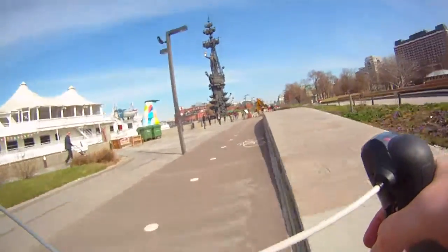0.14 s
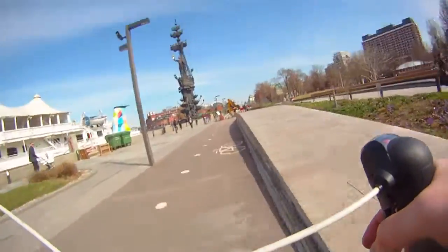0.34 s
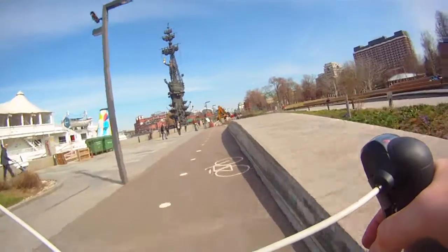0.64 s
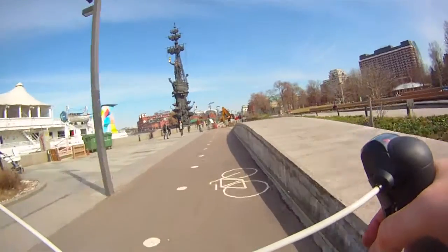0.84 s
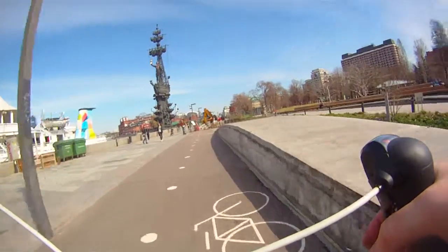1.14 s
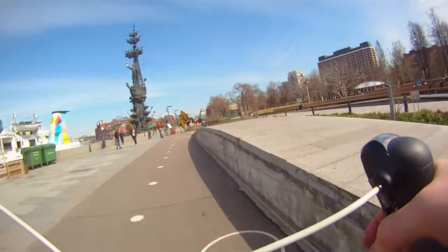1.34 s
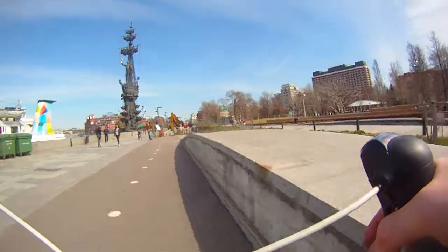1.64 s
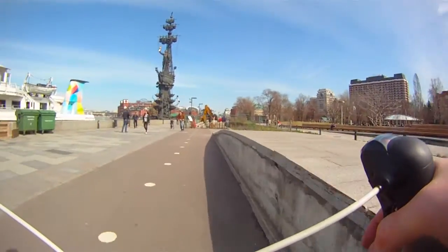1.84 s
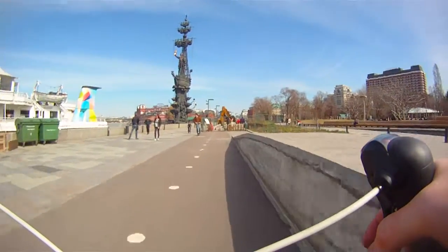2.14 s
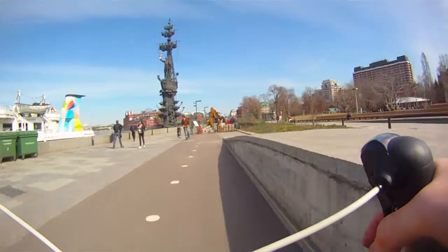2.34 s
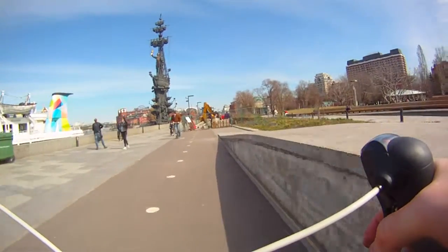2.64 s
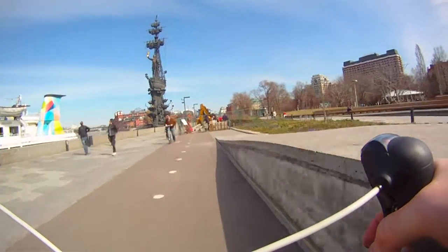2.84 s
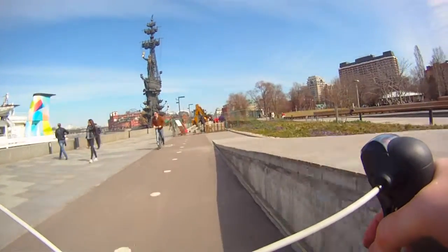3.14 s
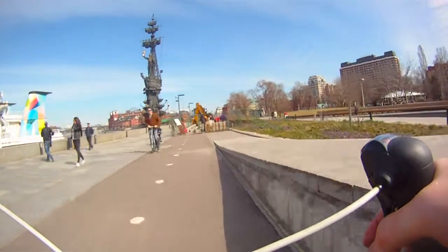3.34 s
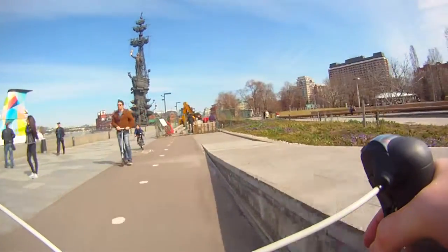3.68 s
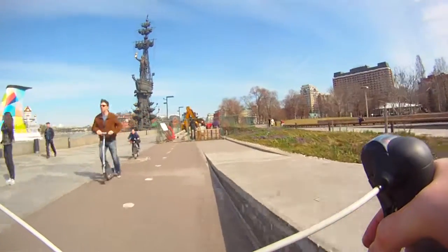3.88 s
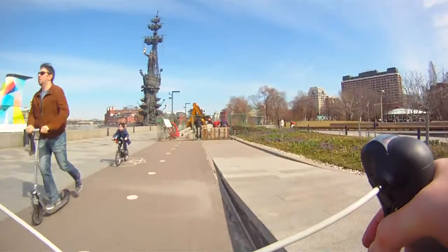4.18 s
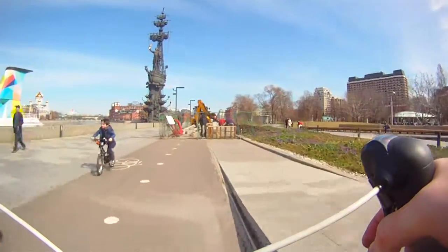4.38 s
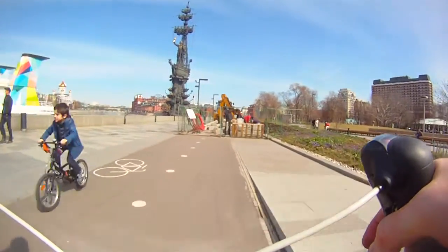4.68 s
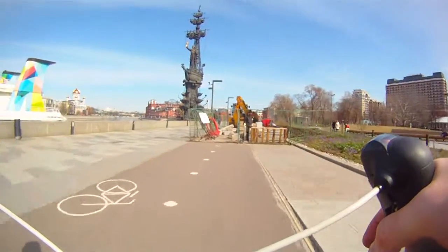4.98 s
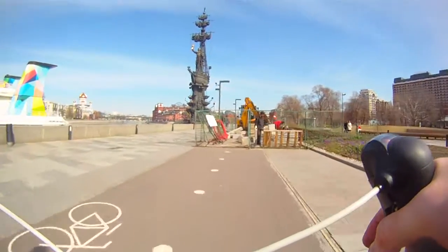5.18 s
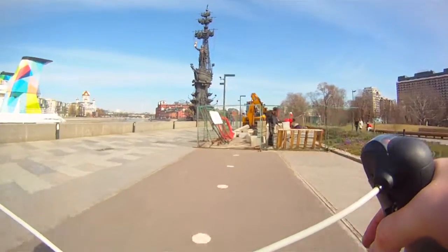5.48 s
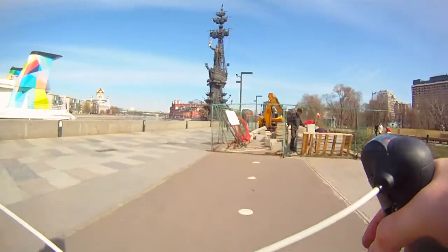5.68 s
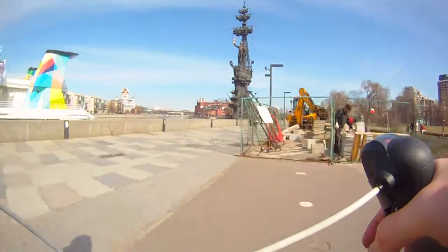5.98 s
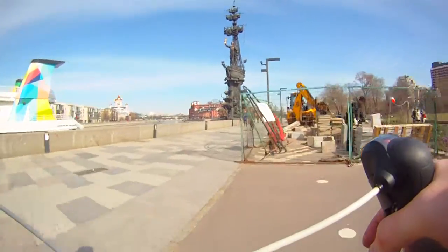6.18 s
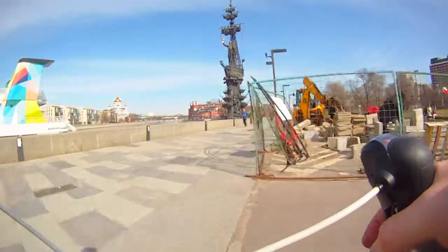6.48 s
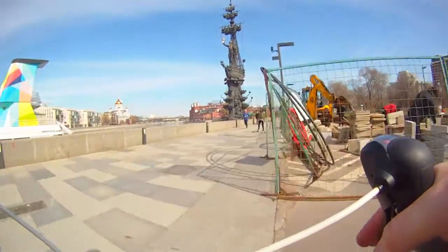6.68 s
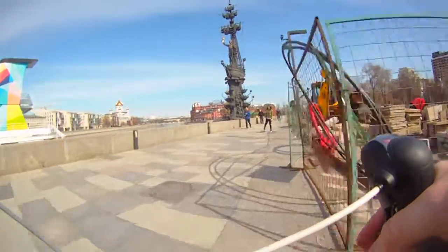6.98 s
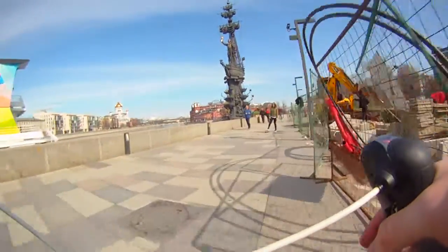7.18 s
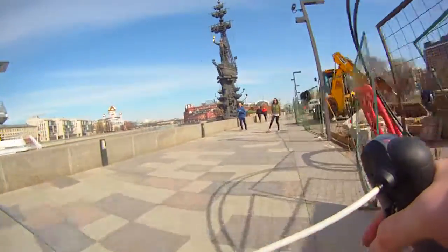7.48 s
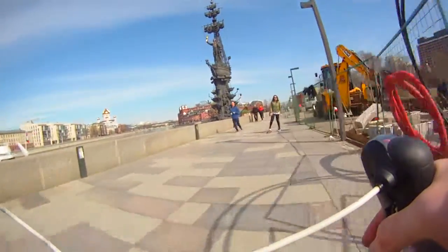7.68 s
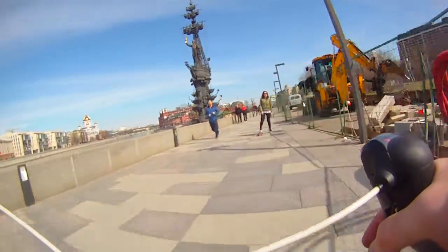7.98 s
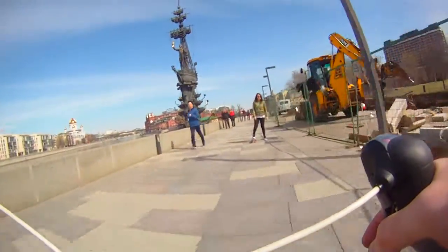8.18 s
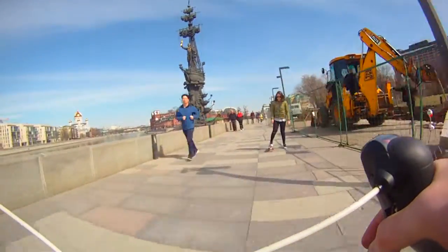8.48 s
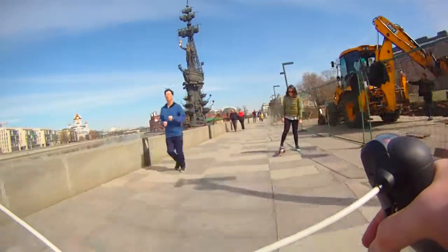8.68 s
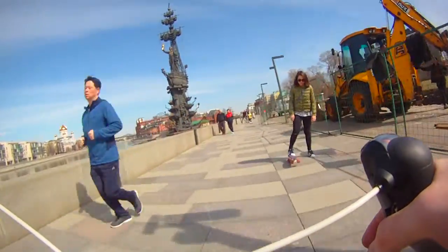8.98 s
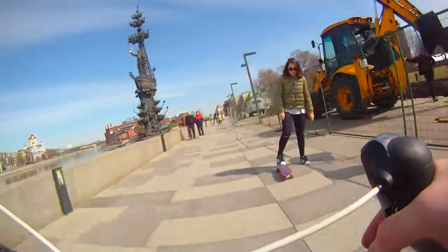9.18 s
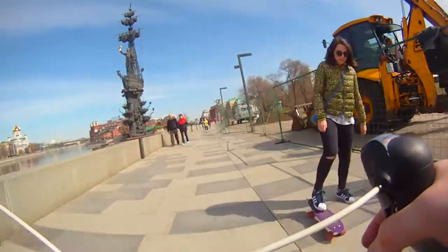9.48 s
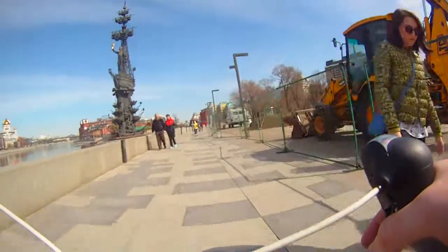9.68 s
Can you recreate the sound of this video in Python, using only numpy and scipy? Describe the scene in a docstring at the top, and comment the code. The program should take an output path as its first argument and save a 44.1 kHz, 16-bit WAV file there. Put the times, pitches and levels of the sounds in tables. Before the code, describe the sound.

A loose camera mount clacks and rattles on a bicycle handlebar, hard at first, then calm muffled rolling, then repeated rattling over paving slabs.

```python
"""A camera's loose mount knocks on a bicycle handlebar along a park path and paving slabs.
Each bump starts a rocking: the latch snaps, the stop is struck, and the case resonances ring on.
Tyre noise drones through the same resonances, over low-passed tread noise and a deep rumble of wind.
Jolts shudder, plastic cracks and a brake pad rubs, all as filtered noise bursts; the camera hisses and whines.
The microphone overloads on the hardest knocks."""
import sys
import numpy as np
from scipy import signal
from scipy.fft import rfft, irfft
from scipy.io import wavfile
from scipy.ndimage import uniform_filter1d

SR = 44100
rng = np.random.default_rng(int(sys.argv[2]) if len(sys.argv) > 2 else 0)


def dump_mix(stems):
    """Bounce the given channels to the path in sys.argv[1] as a 16-bit WAV at rate SR."""
    frames = np.atleast_2d(stems).T  # one column per channel
    limited = np.clip(frames, -1, 1)  # hard clip at full scale
    pcm = np.round(limited * 32767).astype(np.int16)
    wavfile.write(sys.argv[1], SR, pcm)


N = 433483


def undb(db):
    """Level to amplitude: 20 dB is a factor of ten."""
    return 10 ** (np.asarray(db) / 20)


def unit(x):
    """Energy normalisation: scale to rms 1."""
    return x / np.sqrt(np.mean(x ** 2))


def add(track, start_s, sound):
    """Superposition: mix a sound into a track."""
    i = max(0, int(start_s * SR))
    track[i:i + len(sound)] += sound[:max(0, N - i)]


def colour(x, points):
    """Minimum-phase filtering through (pitch_hz, level_db) points; white noise keeps its level."""
    hz, db = np.transpose(points)
    size = 4096
    grid = np.log(np.fft.rfftfreq(size, 1 / SR) + 1)
    log_gain = np.log(undb(np.interp(grid, np.log(hz), db)))
    # folding the cepstrum to positive times makes the response causal
    cepstrum = irfft(log_gain)[:size // 2]
    cepstrum[0] /= 2
    response = irfft(np.exp(rfft(2 * cepstrum, size)))
    return signal.fftconvolve(x, response / np.linalg.norm(response))[:N]


def resonate(x, modes):
    """Modal resonance: parallel (pitch_hz, width_hz, level_db) peaks; white noise nearly keeps its level."""
    out = 0
    power = 0
    for hz, width, db in modes:
        b, a = signal.iirpeak(hz, hz / width, SR)
        out = out + undb(db) * signal.lfilter(b, a, x)
        power += undb(db) ** 2 * np.pi * width / SR
    return out / np.sqrt(power)


def muffle(x, edge_hz):
    """Transmission loss: a steep low-pass."""
    return signal.sosfilt(signal.butter(18, edge_hz, fs=SR, output="sos"), x)


def walk(rate_hz):
    """Random modulation: held random values, smoothed twice and scaled to rms 1."""
    k = int(SR / rate_hz)
    held = np.repeat(rng.standard_normal(N // k + 1), k)
    smooth = uniform_filter1d(uniform_filter1d(held, k), k)
    return unit(smooth[:N])


def ring(modes, scatter):
    """Free modal decay after one tap, peak 1; modes swell over a few cycles and vary from tap to tap."""
    t = np.arange(SR // 20) / SR
    hz, t60, db = np.transpose(modes)[:, :, None]
    detune, weight, phase = rng.standard_normal((3, len(modes), 1))
    rise = 1 - np.exp(-(t * hz / 3.5) ** 2)
    decay = np.exp(-np.log(1000) * t / t60)
    envelope = undb(db + 2 * weight) * rise * decay
    pitch = hz * (1 + scatter * detune)
    out = np.sum(envelope * np.sin(2 * np.pi * pitch * t + 2 * np.pi * phase), axis=0)
    return out / np.abs(out).max()


def thud(hz, swell_s, sag):
    """Impact response: a few cycles swell, sink in pitch through hz and die."""
    t = np.arange(SR // 50) / SR
    u = t / swell_s
    envelope = (u * np.exp(1 - u)) ** 5
    pitch = hz * (1 + sag * np.tanh(1 - u))
    return envelope * np.sin(2 * np.pi * (np.cumsum(pitch) / SR + rng.random()))


def chatter(decay_s):
    """Dissipation: tiny rebounds as noise that dies exponentially after a blow."""
    t = np.arange(SR // 10) / SR
    return rng.standard_normal(len(t)) * np.exp(-t / decay_s)


def swell(length_s):
    """Friction burst: noise that rises and falls once."""
    count = int(length_s * SR)
    return rng.standard_normal(count) * np.sin(np.pi * np.arange(count) / count)


# course of the ride, levels before trim: start_s, tyre_drone_db, low_rumble_db
RIDE_COURSE = [(0, -35.5, -37), (.35, -34.5, -45.5), (.9, -34.5, -50.5), (1.4, -35.5, -42),
               (1.6, -32.5, -51), (2.2, -39, -48.5), (3.3, -40, -48.5), (3.9, -37.5, -50.5),
               (4.3, -40.5, -50), (5.0, -38.5, -49), (5.5, -41, -50), (6.5, -38.5, -49), (6.8, -34, -35),
               (7.15, -36, -41.5), (7.8, -36, -37.5), (8.45, -36, -40), (9.1, -36, -37), (9.83, -33, -39)]
# resonances of case and handlebar: pitch_hz, width_hz, level_under_tyres_db, level_under_blow_db
CASE_MODES = [(121.8, 8.9, -8.5, -14), (189.5, 25, -1, -2), (593, 22.8, 0.5, 0.5), (861, 30, -5, -20),
              (1118, 70, -4, 8), (1160, 8.6, 3.5, -1.5), (1320, 17, -7, 4.5), (1422, 22, -7.5, 14.5),
              (1517, 71, -0.5, 8), (1638, 27, -19, 8.5), (1750, 13, -8, 0), (2130, 59, -37, -18.5),
              (2024, 12, -9, -35.5), (2311, 24, -13, 3), (2675, 40, -27, -19.5), (3360, 214, -11, -44.5),
              (3980, 140, -38.5, -30), (4306, 170, -40, -24.5), (5100, 43, -32.5, -44)]
# relative spectrum of the tyre tread: pitch_hz, level_db (per Hz)
TYRE_SPECTRUM = [(30, -37), (250, -14), (420, -11.5), (750, -2), (1000, -3.5), (1400, 4), (1700, -5.5),
                 (2200, -21), (2650, -20)]
# relative spectrum of wind and road rumble: pitch_hz, level_db (per Hz)
WIND_SPECTRUM = [(20, -14.5), (50, -27), (75, -23.5), (100, 1), (135, 0.5), (200, 6), (270, -2), (340, -10),
                 (700, -53)]


def rolling():
    """Structure-borne sound: grit drives frame and case; wind and road rumble lie below."""
    start_s, *columns = np.transpose(RIDE_COURSE)
    tyre_db, rumble_db = (np.interp(np.arange(N) / SR, start_s, c) for c in columns)
    surface = undb(0.8 * walk(90) + 0.6 * walk(5))
    grit = rng.standard_normal((3, N)) * surface
    modes = [(hz, width, db) for hz, width, db, _ in CASE_MODES]
    drone = undb(0.5) * resonate(grit[0], modes)
    tread = undb(-2.0) * colour(grit[1], TYRE_SPECTRUM)
    # the case walls shut out the treble of the road, but for one faint band
    band = [(4840, 1070, 0)]
    leak = undb(-29.0) * unit(resonate(resonate(grit[2], band), band))
    road = muffle(drone + tread, edge_hz=2680) + leak
    wind_level = undb(rumble_db - 4.5 + 1.5 * walk(11))
    wind = wind_level * colour(rng.standard_normal(N), WIND_SPECTRUM)
    return undb(tyre_db - 1.5) * road + wind


# relative spectrum of the camera's hiss: pitch_hz, level_db (per Hz)
HISS_SPECTRUM = [(100, 14.5), (5000, -5.5), (9000, -3.5), (15000, -6)]


def electronics():
    """Self-noise: the camera's own hiss and a thin, frequency-modulated whine."""
    whine = np.sin(2 * np.pi * np.cumsum(7870 + 45 * walk(250)) / SR)
    hiss = colour(rng.standard_normal(N), HISS_SPECTRUM)
    return undb(-75.5) * whine + undb(-71) * hiss


# bumps that set the camera rocking, levels before trim: start_s, first_knock_level_db, knock_count,
# swing_s, fall_per_swing_db (negative: the rocking builds up), latch_level_db
BUMP_SWINGS = [(0.001, 11, 2, .014, 9.5, -4), (0.051, -3.5, 2, .022, -5.5, -26),
               (0.11, -5, 2, 0.026, 15, -38), (0.159, 2.5, 2, 0.015, 19, -20),
               (0.21, 4.5, 2, 0.0082, -7.5, -28), (0.24, -10, 2, .013, -10, -21),
               (0.277, 4.5, 3, 0.01, 10, -23), (0.522, -7, 3, 0.021, 4, -38),
               (0.618, -18.5, 1, .019, 0, -42), (1.039, -8, 2, 0.055, 15, -41),
               (1.142, -19, 2, 0.023, 14, -40), (1.45, -15.5, 2, 0.037, -0.5, -28),
               (1.543, 6, 3, 0.014, 0.5, -13.5), (1.592, -5, 2, 0.021, 8, -15),
               (1.663, 3, 3, 0.018, 3, -15), (1.783, -14, 1, .019, 0, -24.5),
               (1.861, -7.5, 1, .019, 5, -57), (1.882, 3.5, 2, 0.016, 1, -12.5),
               (1.938, -9.5, 2, 0.0069, 9, -31), (2.154, -21, 1, 0.021, 0, -52),
               (2.72, -19, 1, 0.021, 4, -48), (4.429, -20.5, 1, 0.024, 0, -53),
               (5.803, -18, 1, .019, 0, -42), (5.837, -6.5, 2, 0.032, 6, -41),
               (6.08, -18, 1, 0.017, 0, -40), (6.179, -17, 2, .015, 5, -33), (6.658, 7.5, 2, .015, -1, -11),
               (6.697, 8, 2, 0.018, 2.5, -21), (6.776, -9, 1, 0.021, -5, -35), (6.795, 3, 3, 0.021, 4, -36),
               (6.856, -1.5, 2, .015, -5, -20), (6.946, -3, 3, .01, 7, -13),
               (7.274, -2.5, 3, 0.02, -6, -22.5), (7.335, 2.5, 2, .02, 12, -9.5),
               (7.372, 5, 2, 0.02, 14, -15), (7.444, -9.5, 2, 0.038, 3, -25),
               (7.527, 2.5, 2, 0.019, 12, -16), (7.677, 5, 2, .018, 3, -38),
               (7.72, -12.5, 2, .021, -5, -17.5), (7.793, 3, 2, 0.025, 7, -16.5),
               (7.836, 3, 2, .02, 24, -16), (7.955, -12.5, 1, 0.017, 0, -35),
               (7.992, -0.5, 3, 0.016, -2, -16), (8.099, -7, 2, 0.024, 3.5, -15.5),
               (8.212, -11, 2, 0.0082, 6.5, -17), (8.315, -7, 1, 0.022, 0, -47),
               (8.334, 3.5, 2, .021, 10, -17), (8.567, -6, 3, 0.018, 4.5, -38),
               (8.625, 5, 5, .0183, 1.4, -12), (8.914, -12, 2, .019, -12, -26),
               (9.016, -13, 2, 0.012, -8, -38), (9.058, 1.5, 2, 0.03, 14.5, -14),
               (9.125, -8.5, 2, 0.023, 3.5, -22), (9.511, -3, 2, 0.024, -4.5, -30),
               (9.555, -12, 2, 0.023, -7.5, -24), (9.695, -15.5, 2, 0.017, -12.5, -30),
               (9.763, 1, 2, 0.019, 7.5, -12.5)]
THUD_HZ, THUD_SPREAD = 1549, 0.078  # centre pitch of a knock, and the share by which it varies
LATCH_LEAD_S, LATCH_SPREAD_DB = 0.0098, 3.5  # the latch snaps on the back swing; no two equally hard
STUTTER_S, STUTTER_DB = 0.0052, -22.5  # mean delay of the second touch, and its level under the knock
SETTLE_S, SETTLE_DB = 0.14, -33  # range of the random delay of one graze per bump, level before trim


def rocking():
    """Oscillation against a stop: knocks (start_s, level_db, pitch_hz), clicks, ticks (start_s, level_db)."""
    knocks, clicks, ticks = [], [], []
    for start_s, knock_db, count, swing_s, fall_db, latch_db in BUMP_SWINGS:
        for k in range(round(count)):
            at_s = start_s + k * swing_s
            lost_db = k * fall_db
            pitch, stutter_pitch, delay, snap = rng.uniform(-1, 1, size=4)
            knock_hz = THUD_HZ * (1 + THUD_SPREAD * pitch)
            knocks.append((at_s, knock_db - lost_db, knock_hz))
            stutter_s = at_s + STUTTER_S * (1 + delay / 3)
            stutter_hz = THUD_HZ * (1 + 2 * THUD_SPREAD * stutter_pitch)
            knocks.append((stutter_s, knock_db - lost_db + STUTTER_DB, stutter_hz))
            clicks.append((at_s - LATCH_LEAD_S, latch_db - lost_db + LATCH_SPREAD_DB * snap))
        # at_s is now the last knock: the delay runs from one swing after it
        ticks.append((at_s + swing_s + SETTLE_S * rng.random(), SETTLE_DB))
    return knocks, clicks, ticks


# first contact of the mount: pitch_hz, t60_s, level_db (before random weighting)
CONTACT_MODES = [(4800, 0.0071, 0.5), (5635, 0.0047, 3.5), (8100, 0.0027, -2.5), (12570, 0.0024, -8),
                 (14000, 0.0027, -9)]
# the camera's frame bumps the bar, duller than the mount: start_s, level_db (before trim), pitch_hz
FRAME_KNOCKS = [(0.279, -3, 1055), (1.495, -16.5, 1300), (9.037, -7, 1010)]


def strike(knocks, direct, rebounds, drive, fittings):
    """Impact excitation: a tick of contact, a thud, and rebounds that feed case and fittings."""
    for start_s, db, hz in knocks + list(FRAME_KNOCKS):
        # the tick grows more slowly with force than the thud does
        add(direct, start_s - 0.0006, undb(0.86 * db - 20.0) * ring(CONTACT_MODES, scatter=0.075))
        add(direct, start_s + 0.00029, undb(db - 2.0) * thud(hz, swell_s=0.0023, sag=0.16))
        add(rebounds, start_s + 0.001894, undb(db - 14.5) * chatter(decay_s=0.0091))
        add(drive, start_s + 0.002, undb(db - 12.5) * chatter(decay_s=0.0045))
        add(fittings, start_s + 0.000973, undb(db - 42) * chatter(decay_s=0.026))


# the latch snaps on its own: start_s, level_db (before trim)
LONE_CLICKS = [(0.03, -5.5), (0.188, -11), (0.304, -10), (0.423, -24), (0.548, -18), (1.39, -21),
               (1.462, -17), (1.626, -15.5), (2.274, -24), (4.168, -27.5), (4.702, -27.5), (6.116, -18.5),
               (6.398, -29.5), (6.538, -26.5), (6.619, -20), (6.898, -18), (6.914, -15.5), (6.997, -15.5),
               (7.073, -25), (7.205, -23), (7.238, -20.5), (7.868, -14), (7.935, -20), (9.312, -22),
               (9.355, -20)]
# ring of the latch: pitch_hz, t60_s, level_db (before random weighting)
LATCH_MODES = [(1467, 0.035, -0.5), (2337, 0.035, 1), (2515, 0.03, -3.5), (4700, 0.029, -19.5),
               (8150, 0.014, -26.5), (10140, 0.0095, -27.5), (13000, 0.0061, -35)]


def snap_latch(clicks, direct, drive):
    """Snap-through: the latch rings in its own modes and drives the case."""
    for start_s, db in clicks + list(LONE_CLICKS):
        add(direct, start_s - 0.0009, undb(db + 2.0) * ring(LATCH_MODES, scatter=0.0184))
        add(drive, start_s + 0.001006, undb(db - 9.5) * chatter(decay_s=0.0092))


# graze level on smooth road (before trim), dB gained per dB of tyre drone, drone setting of smooth road
GRAZE_DB, GRAZE_GROWTH, SMOOTH_ROAD_DB = -60, 4, -40.5


def grazes(count, spread_db):
    """Random excitation: faint ticks, harder where the road is rough, as start_s, level_db."""
    when, size = rng.random((count, 2)).T
    start_s = when * N / SR
    ride_s, tyre_db, _ = np.transpose(RIDE_COURSE)
    rough_db = np.interp(start_s, ride_s, tyre_db) - SMOOTH_ROAD_DB
    level_db = GRAZE_DB + GRAZE_GROWTH * rough_db + spread_db * size ** 2
    return list(zip(start_s, level_db))


# the mount only grazes its stop: start_s, level_db (before trim)
MOUNT_TICKS = [(0.132, -20), (0.341, -25), (0.897, -27), (1.36, -26.5), (1.993, -27), (2.103, -36),
               (2.23, -31), (3.696, -32), (3.809, -36), (3.929, -27.5), (4.027, -29.5), (4.659, -36),
               (4.919, -33.5), (6.046, -24), (7.097, -31), (7.135, -28), (7.175, -24.5), (7.577, -23),
               (8.817, -21.5), (9.19, -24.5)]


def graze_stop(ticks, direct, drive):
    """Light contact: a soft touch wakes only the two lowest contact modes."""
    for start_s, db in ticks + list(MOUNT_TICKS) + grazes(count=70, spread_db=16):
        add(direct, start_s, undb(db - 7.0) * ring(CONTACT_MODES[:2], scatter=0.035))
        add(drive, start_s + 0.00094, undb(db - 4.5) * chatter(decay_s=0.0048))


# the mount slips in its clamp: start_s, length_s, level_db (before filtering)
MOUNT_SLIPS = [(0.508, 0.024, -19), (9.013, 0.039, -14.5)]


def slip(rebounds):
    """Sliding friction: each slip is one swell of noise."""
    for start_s, length_s, db in MOUNT_SLIPS:
        add(rebounds, start_s, undb(db) * swell(length_s))


# relative spectrum of knock rebounds and slips: pitch_hz, level_db (per Hz)
BLOW_SPECTRUM = [(30, -36), (180, -19), (350, -20.5), (800, 1), (1500, 6.5), (2100, 3.5), (2600, 5.5),
                 (3050, -25.5), (5200, -38), (6000, -41.5)]


def rattle():
    """Source and resonator: contacts sound directly, and their rebounds and slips through the case."""
    direct, rebounds, drive, fittings = np.zeros((4, N))
    knocks, clicks, ticks = rocking()
    strike(knocks, direct, rebounds, drive, fittings)
    snap_latch(clicks, direct, drive)
    graze_stop(ticks, direct, drive)
    slip(rebounds)
    case = resonate(drive, [(hz, width, db) for hz, width, _, db in CASE_MODES])
    # cables and levers buzz on faintly after each knock
    buzz = resonate(fittings, [(4160, 2400, 0)])
    tail = muffle(case + colour(rebounds, BLOW_SPECTRUM) + buzz, edge_hz=5800)
    # plastic damps the top at once: only a trace of it outlasts the contact
    fizz = undb(-31.5) * resonate(drive, [(9500, 11000, 0)])
    return direct + tail + fizz


# heavy jolts that shake the whole handlebar: start_s, level_db (of the shudder, before filtering)
BAR_JOLTS = [(0.004, -47), (0.162, -22), (0.214, -14.5), (0.251, -32), (0.28, -22.5), (1.557, -29.5),
             (1.885, -49.5), (6.678, -34)]
# relative spectrum of the shudder: pitch_hz, level_db (per Hz)
SHAKE_SPECTRUM = [(20, -3), (55, 1.5), (115, -12), (180, 6.5), (300, -10.5), (600, -10.5), (1500, -53.5)]
# the metal of the handlebar sings on: pitch_hz, t60_s, level_db (relative)
METAL_MODES = [(4330, .6, 2.5), (4840, 0.43, -6)]


def handlebar():
    """Transient vibration: heavy jolts leave a short, deep shudder and a faint metal ring."""
    shudder, song = np.zeros((2, N))
    t = np.arange(SR // 2) / SR
    for start_s, db in BAR_JOLTS:
        add(shudder, start_s, undb(db) * chatter(decay_s=0.017))
        for hz, t60, mode_db in METAL_MODES:
            decay = np.exp(-np.log(1000) * t / t60)
            tone = np.sin(2 * np.pi * (hz * t + rng.random()))
            # the ring is equally strong after every jolt
            add(song, start_s, undb(mode_db - 54) * decay * tone)
    return colour(shudder, SHAKE_SPECTRUM) + song


# dry cracks of the plastic: start_s, level_db (before filtering)
PLASTIC_CRACKS = [(0.212, -0.5), (1.039, -43), (2.721, -45.5), (4.431, -52), (5.839, -16.5)]


def plastic():
    """Sudden stress release: plastic lets go with a short, bright crack."""
    cracks = np.zeros(N)
    for start_s, db in PLASTIC_CRACKS:
        add(cracks, start_s, undb(db) * chatter(decay_s=0.00042))
    band = [(4540, 3200, 0)]
    return resonate(resonate(cracks, band), band)


# a brake pad brushes the wheel: start_s, length_s, pitch_hz, width_hz (of each of two filter passes),
# level_db (rms, before flutter)
BRAKE_RUBS = [(0.38, 0.84, 4770, 170, -62), (2.877, 0.15, 4800, 2400, -69.5), (3.66, 0.47, 4700, 1300, -68),
              (5.279, 0.22, 4000, 2410, -71), (5.692, 0.15, 4680, 1300, -57),
              (6.003, 0.17, 3700, 2200, -61), (8.98, 0.56, 4780, 200, -60.5)]


def brake():
    """Uneven friction: a hiss, or a thin fluttering song where the band is narrow."""
    rubs = np.zeros(N)
    for start_s, length_s, hz, width, db in BRAKE_RUBS:
        band = [(hz, width, 0)]
        rub = resonate(resonate(swell(length_s), band), band)
        add(rubs, start_s, undb(db) * unit(rub))
    flutter = undb(3.5 * walk(45))
    return rubs * flutter


def scene():
    """Superposition: all sources add up at the one microphone."""
    ride = rolling() + electronics()
    return (ride + rattle() + handlebar() + plastic() + brake())[None]


def record(dry):
    """Overload and band limiting: peaks clip, then the deepest bass and the top are cut."""
    clipped = np.clip(dry, -1, 1)
    bass_cut = signal.butter(1, 30, "high", fs=SR, output="sos")
    top_cut = signal.ellip(8, 0.2, 90, 15600, fs=SR, output="sos")  # ripple dB, rejection dB, edge Hz
    return signal.sosfilt(top_cut, signal.sosfilt(bass_cut, clipped))


dry = scene()
out = record(dry)
dump_mix(out)
```